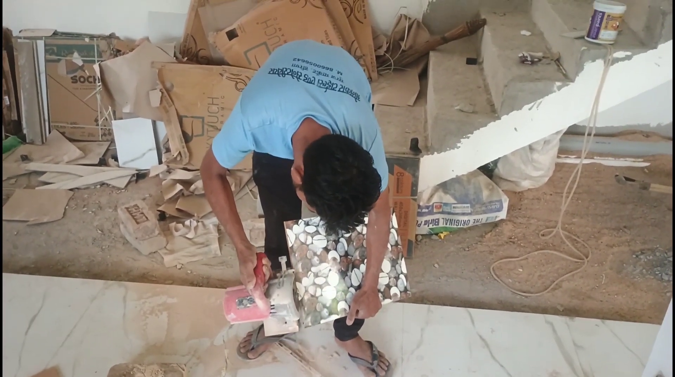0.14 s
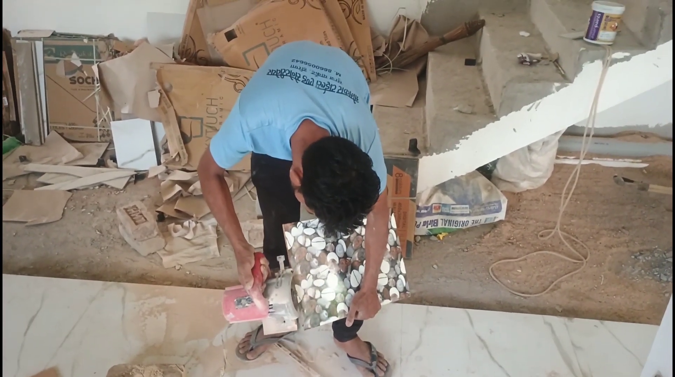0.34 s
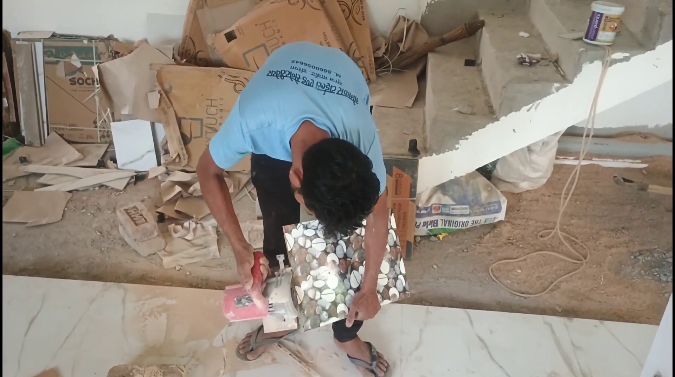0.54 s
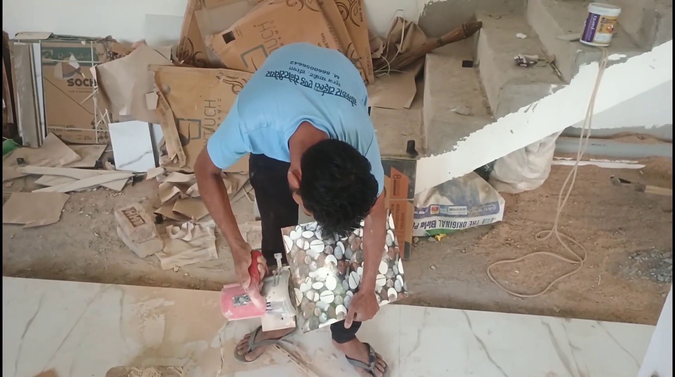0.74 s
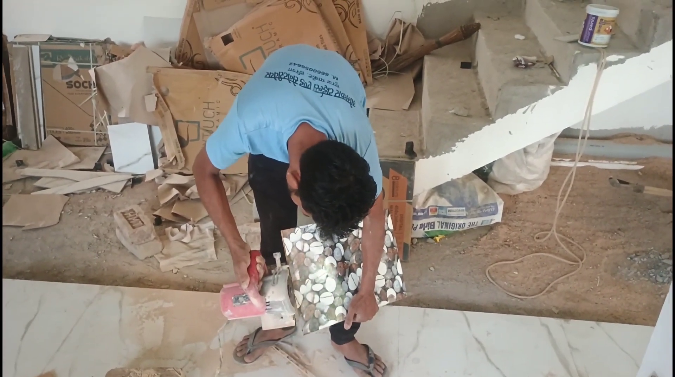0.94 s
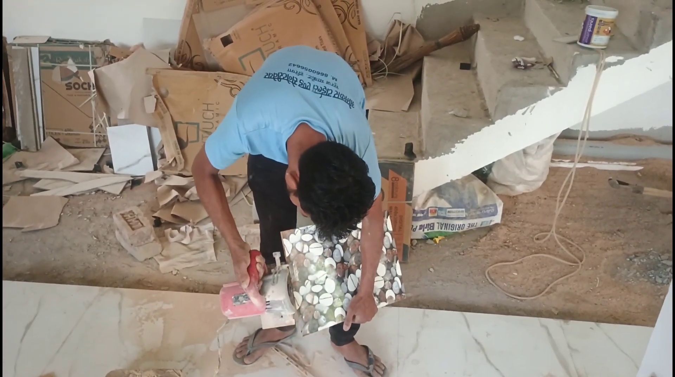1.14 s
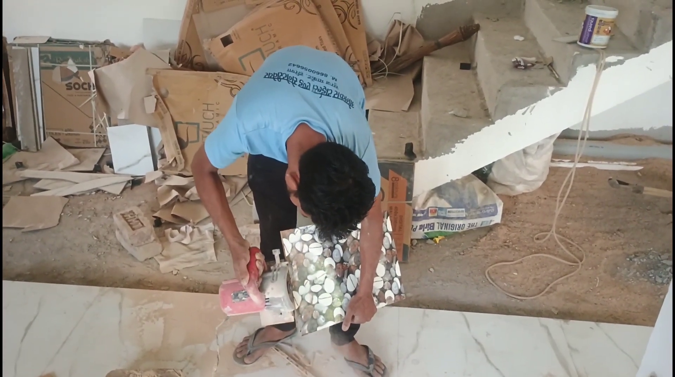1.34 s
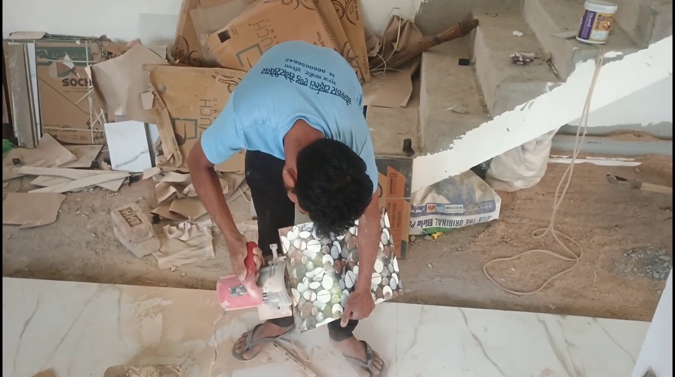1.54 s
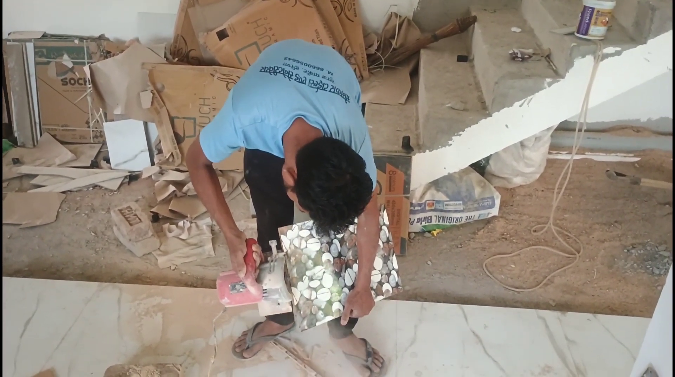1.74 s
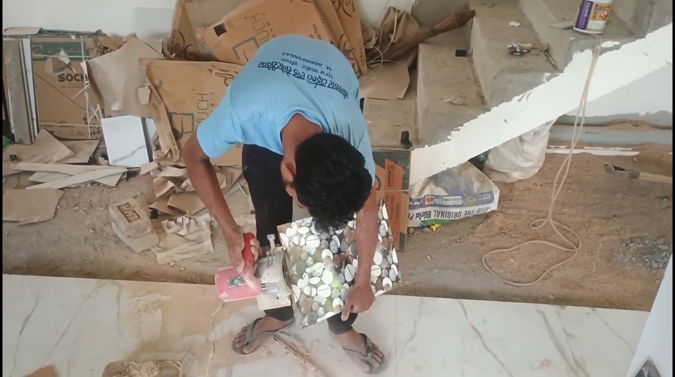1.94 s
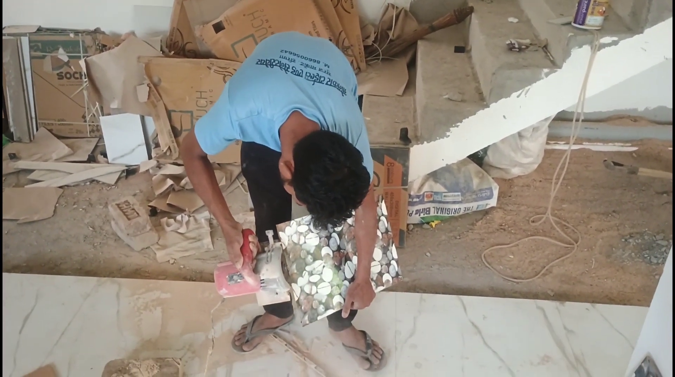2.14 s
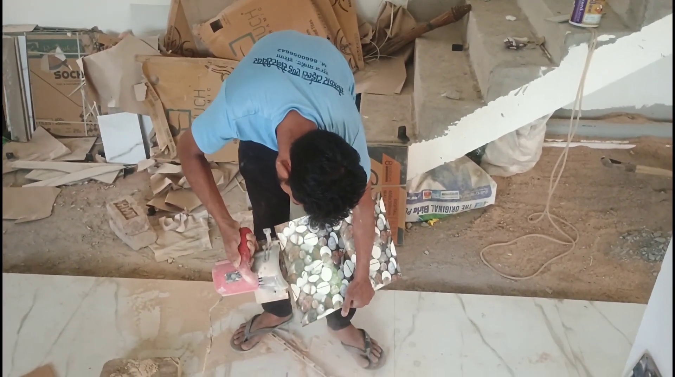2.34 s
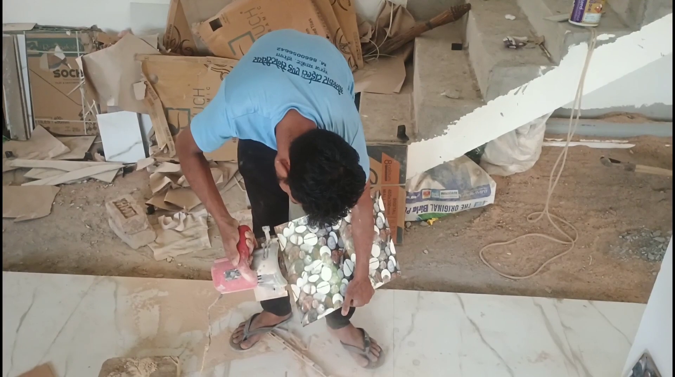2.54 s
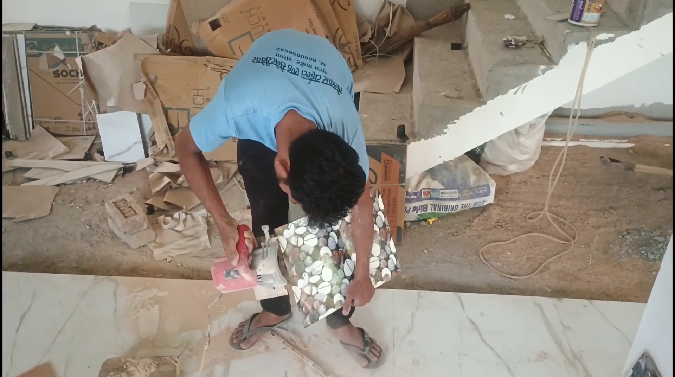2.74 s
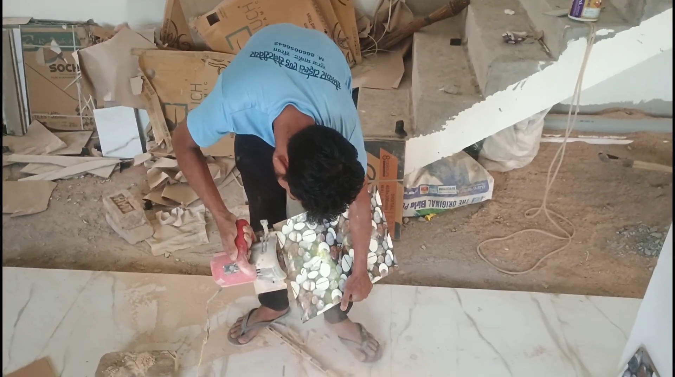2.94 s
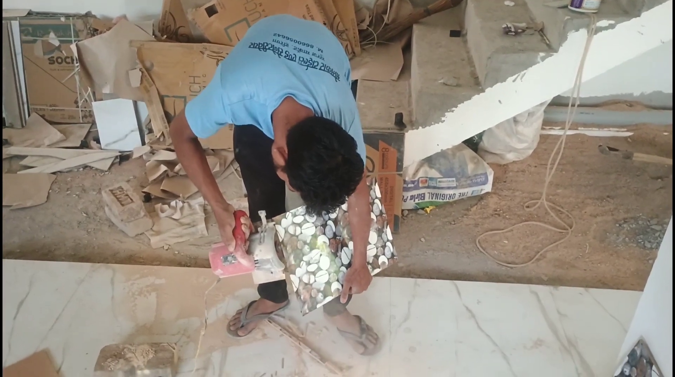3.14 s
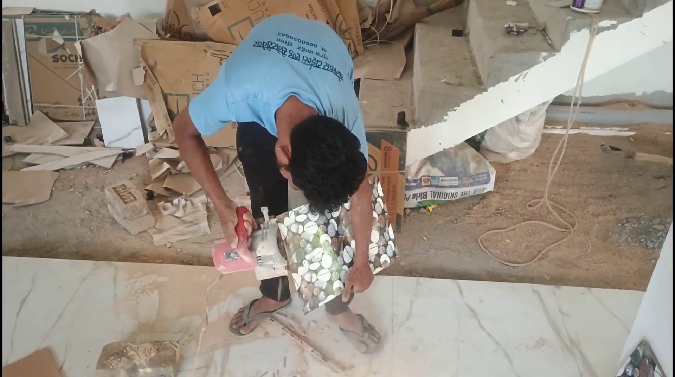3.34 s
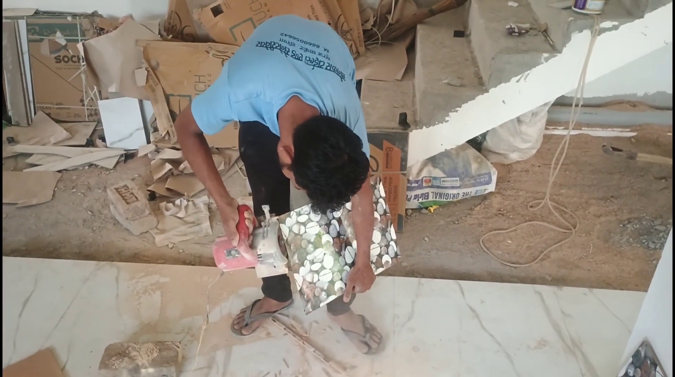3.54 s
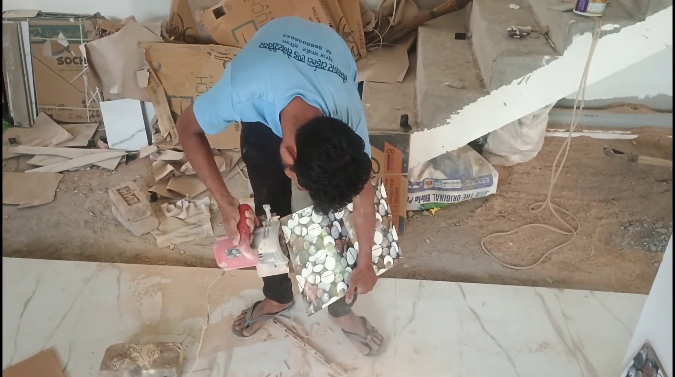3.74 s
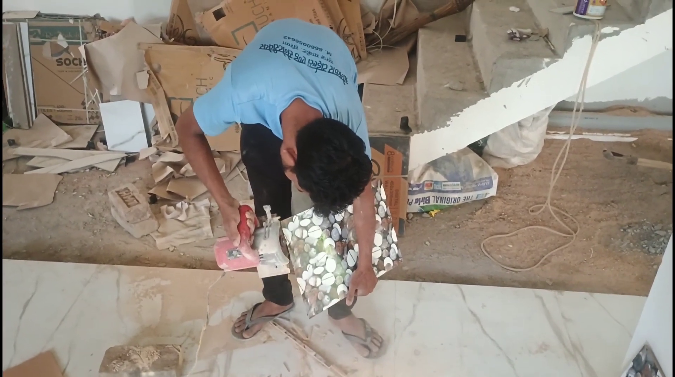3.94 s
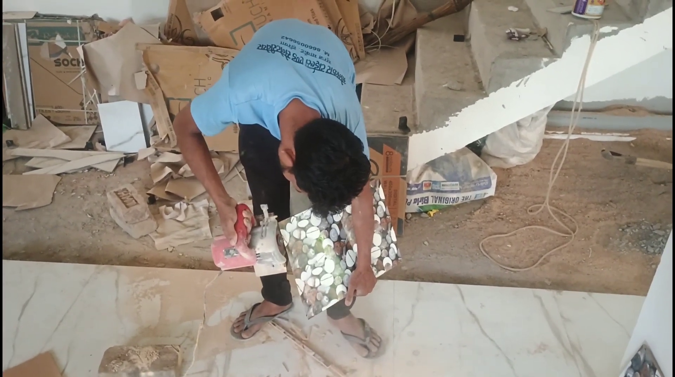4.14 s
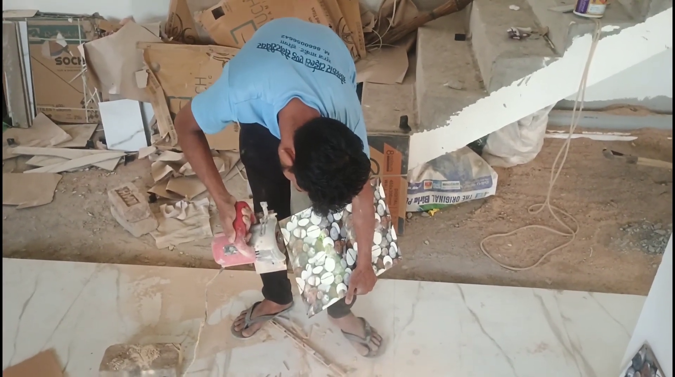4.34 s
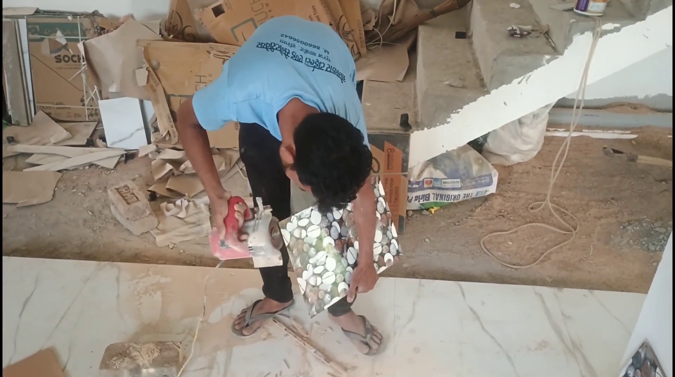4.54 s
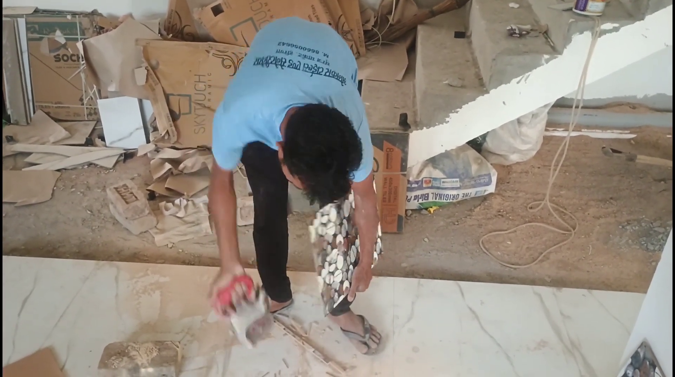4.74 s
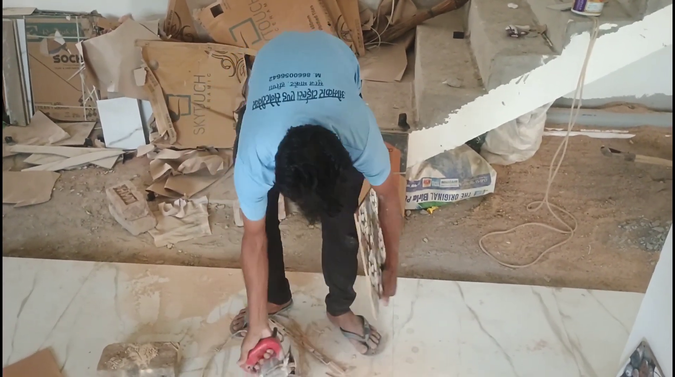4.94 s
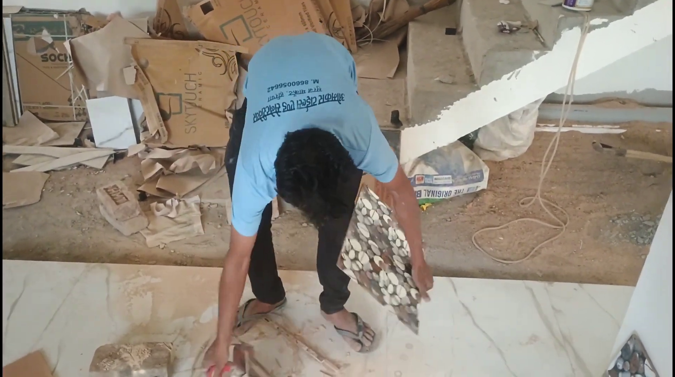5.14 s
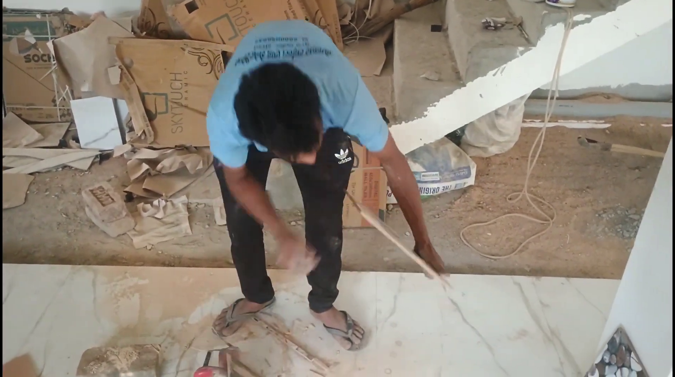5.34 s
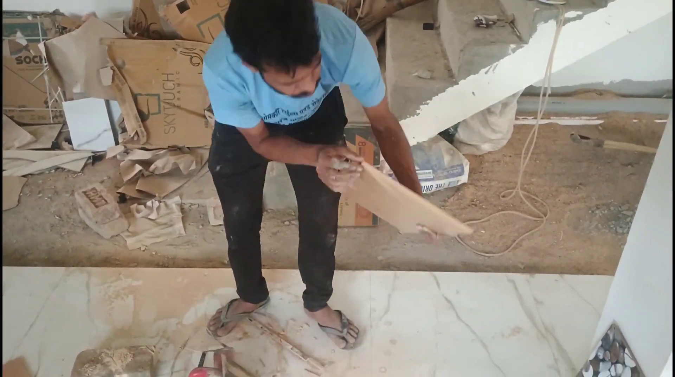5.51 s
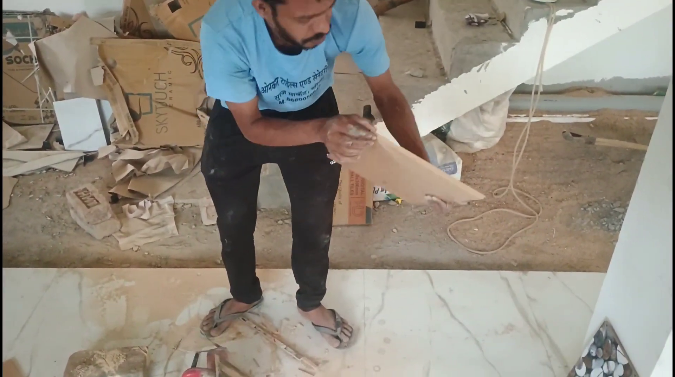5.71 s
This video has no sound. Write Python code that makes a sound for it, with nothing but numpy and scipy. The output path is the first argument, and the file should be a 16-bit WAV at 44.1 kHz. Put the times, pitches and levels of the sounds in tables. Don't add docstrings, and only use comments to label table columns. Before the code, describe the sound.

From 0 to about 4.4 seconds a handheld electric cutter grinds through ceramic tile, already running at full speed. The sound is loud, dense and bright: sandy grit hiss strongest in the treble, many shifting metallic blade resonances, a buzzing motor hum and a gear whine near 900 Hz that briefly slips around 1.2 and 3.6 seconds and rises slightly. Low rumble is faint. At about 4.5 seconds the power is cut; hum fades quickly, the whine slides downward and wavers, and the hiss dips near 4.7 before returning. The freed blade rings high and airy. At 5.05 the tool touches the floor with a soft thud and scrape, then a stronger knock and brighter drag come around 5.3. It rocks slightly, making the sound flutter, while the coasting hiss weakens and dulls until the end at about 5.9, with faint last bumps. Close stereo microphone, bare hallway.

```python
import sys
import numpy as np
from scipy import signal
from scipy.io import wavfile

SR = 44100
rng = np.random.default_rng(int(sys.argv[2]) if len(sys.argv) > 2 else 0)


def generate_wav(sig):
    pcm = np.round(np.clip(np.atleast_2d(sig).T, -1, 1) * 32767).astype(np.int16)
    wavfile.write(sys.argv[1], SR, pcm)


def convert_level_to_amplitude(level_db):
    exponent = np.asarray(level_db, float) / 20
    return 10 ** exponent


N = 258845

SWITCH_OFF_S = 4.5
WHINE_PER_TURN = 2.3885


def rms_one(x):
    return x / np.sqrt(np.mean(x ** 2) + 1e-20)


def in_time(rows):
    s, *columns = np.transpose(rows)
    return [np.interp(np.arange(N) / SR, s, c) for c in columns]


def at_hz(points, hz):
    table_hz, values = np.array(points).T
    return np.interp(np.log(hz), np.log(table_hz), values)


def by_stage(levels_db):
    return np.interp(np.arange(N) / SR, (1, 2.95, 4.3), levels_db)


def drift(rate):
    r = np.exp(-128 * np.pi * rate / SR)
    noise = rng.standard_normal(N // 64 + 1002)
    slow = signal.lfilter([1], [1, -2 * r, r * r], noise)[1000:]
    return np.interp(np.arange(N) / 64, np.arange(len(slow)), rms_one(slow))


def swells(rows):
    t = np.arange(N) / SR
    return sum(size * np.exp(-((t - s) / length) ** 2) for s, size, length in rows)


def resonate(x, hz, width_hz):
    r = np.exp(-np.pi * width_hz / SR)
    return rms_one(signal.lfilter([1, 0, -1], [1, -2 * r * np.cos(2 * np.pi * hz / SR), r * r], x))


def sliding_noise(hz, width_hz):
    lowpass = signal.butter(2, width_hz, fs=SR, output="sos")
    slow = signal.sosfilt(lowpass, rng.standard_normal((2, 2, N)))
    carrier = 2 * np.pi * np.cumsum(hz) / SR
    return rms_one(slow[0] * np.cos(carrier) + slow[1] * np.sin(carrier))


# pitch in Hz, likeness from 0 (unrelated) to 1 (the same).
EAR_LIKENESS = [(60, 0), (130, .1), (290, .6), (640, .86), (1410, .85), (2200, .45), (3000, .25),
                (4500, .5), (8000, .35), (15000, .22)]
# pitch in Hz, left minus right in dB.
EAR_LEAN = [(60, 5), (180, 4), (550, 0), (1650, 1), (4970, -0.5), (15000, 1.5)]


def spread(mid_side, hz):
    alike, lean_db = np.clip(at_hz(EAR_LIKENESS, hz), -1, 1), at_hz(EAR_LEAN, hz) / 2
    mid = np.sqrt(1 + alike) * mid_side[0]
    side = np.sqrt(1 - alike) * mid_side[1]
    lag = 9 if hz > 3100 else 0
    return np.array([convert_level_to_amplitude(lean_db) * (mid + side), convert_level_to_amplitude(-lean_db) * np.roll(mid - side, lag)])


# time in seconds, gear whine in Hz.
LOADED_WHINE = [(0, 895.5), (1.2, 887.8), (1.42, 890.5), (1.85, 890.8), (2.2, 902.4), (2.6, 896.6),
                (3.5, 904), (3.75, 911), (4.5, 916)]


def speed_hz():
    off_s = np.maximum(np.arange(N) / SR - SWITCH_OFF_S, 0)
    fan_halving_s, brush_drag_hz_per_s = .83, 42
    return in_time(LOADED_WHINE)[0] / (1 + off_s / fan_halving_s) - brush_drag_hz_per_s * off_s


# time in seconds, dip in dB.
ROCKS = [
    (5.1, 1),
    (5.175, 4),
    (5.272, 1.5),
    (5.378, 2.5),
    (5.505, 2),
    (5.67, 2),
]


def rocking_db():
    return swells([(s, dip_db, 0.027) for s, dip_db in ROCKS])


# time in seconds, hiss in
# dB.
HISS_LEVEL = [(0, -14.5), (.3, -14), (1.15, -13.5), (1.5, -14), (2.05, -14), (2.5, -14), (2.9, -13.6),
              (3.5, -13.4), (3.75, -14), (4.41, -13.5), (4.73, -20.5), (5.05, -15.5), (5.3, -18), (5.6, -19),
              (5.87, -22.5)]


def loudness_db():
    return in_time(HISS_LEVEL)[0] - rocking_db()


# time in seconds, change in dB, length in seconds.
BOOMS = [
    (2.3, -12, .12),
    (3.3, -9, .12),
    (3.9, -6, .15),
    (4.75, -12, 0.078),
    (4.96, -10, .04),
    (5.07, 4, .04),
    (5.35, 14, 0.055),
    (5.51, 8, .03),
    (5.86, 4, .06),
]


def balance_db(level_db, in_cut):
    t = np.arange(N) / SR
    slowed = 1 - speed_hz() / LOADED_WHINE[-1][1]
    lows_db = -17 - .8 * (level_db + 14) * in_cut + 8 * slowed
    cutting = np.clip((4.4 - t) / .05, 0, 1)
    cut_rumble_db, free_rumble_db = -48.5 - 1 * t, -61.5
    return lows_db, cutting * cut_rumble_db + (1 - cutting) * free_rumble_db + swells(BOOMS)


# pitch in Hz, level in dB per Hz.
GRINDING = [(20, -29), (150, -33.5), (300, -31), (650, -20.5), (1080, -14.5), (2400, -13.5), (3200, -3.5),
            (4300, -1), (5200, -2.5), (8000, 1), (11500, -2.5), (14300, -1.5), (16000, -17)]
# pitch in Hz, level in dB per Hz.
COASTING = [(20, -39), (150, -35), (280, -38.5), (450, -24), (700, -14.5), (1140, -10), (2400, -10),
            (3340, -4), (5140, -6.5), (6210, -5), (7700, -5), (13200, -8), (16000, -17)]


def hiss(in_cut, patchy_db, bass_lumps_db):
    level_db = loudness_db()
    lows_db, rumble_db = balance_db(level_db, in_cut)
    lumps = drift(2.9)
    white = rng.standard_normal((2, 2, N))
    edges_hz = 22 * 2 ** (np.arange(30) / 3)
    out, power, together = 0, 0, drift(5.7)
    for k, (low, high) in enumerate(zip(edges_hz, edges_hz[1:])):
        hz = np.sqrt(low * high)
        gain = convert_level_to_amplitude(in_cut * at_hz(GRINDING, hz) + (1 - in_cut) * at_hz(COASTING, hz))
        power = power + gain ** 2 * (high - low)
        if hz < 240:
            lumpy_db = bass_lumps_db * (0.45 * lumps + drift(9.3))
            gain = gain * (convert_level_to_amplitude(rumble_db + 51.5 + lumpy_db) + convert_level_to_amplitude(-25))
        elif hz < 2200:
            gain = gain * convert_level_to_amplitude(lows_db + 13.0 + 5.97 * in_cut)
        flicker_db = patchy_db * (2.2 - 1.18 * in_cut) * (0.81 * together + drift(11.4))
        band_filter = signal.butter(2, [low, high], "band", fs=SR, output="sos")
        band = signal.sosfilt(band_filter, white[k % 2])
        out = out + gain * convert_level_to_amplitude(flicker_db) * spread(band, hz)
    return convert_level_to_amplitude(level_db - 2.5 + 1.08 * (1 - in_cut)) * out * np.sqrt(SR / 2 / power)


BLADE_HZ = [1830, 2630, 3438, 4200, 4340, 4650, 4848, 5358, 5765, 6755, 6912, 7050, 7300, 7506, 7655, 7750,
            8000, 8400, 8950, 9230, 9458, 11355, 11560, 11738, 12200, 12800, 14600]
# width in Hz, level in dB at start, middle and end of the cut.
BLADE_SHAPES = [(86.4, -43, -40, -43), (75.6, -41.5, -45.5, -39), (50, -49.5, -52, -39.5),
                (35, -36, -34, -29.5), (252, -28.5, -30, -32), (348, -30, -35.5, -30), (50, -33, -33, -37),
                (50, -40, -51, -34), (50, -33.5, -36.5, -61), (90, -29.5, -33.5, -30.5),
                (80, -27.5, -35.5, -27), (120, -29, -40, -26), (120, -29, -30, -32),
                (46.296, -33, -29, -34), (50, -39, -34, -28), (46.296, -26.5, -28, -32),
                (110, -31, -26.5, -26.5), (60, -30.5, -52, -40), (70, -34, -32, -43), (110, -30, -31, -33),
                (50, -41, -44, -41), (50, -26, -28, -29.5), (200, -30.5, -31.5, -29), (50, -27.5, -46, -33),
                (100, -33, -43, -30), (70, -31, -36, -40), (120, -32, -41, -43)]


def blade(in_cut, wander_db):
    grit, out = rng.standard_normal((2, N)), 0
    for k, (hz, (width_hz, *levels_db)) in enumerate(zip(BLADE_HZ, BLADE_SHAPES)):
        wander = wander_db * np.array([drift(0.85), drift(0.4)])
        gain = convert_level_to_amplitude(by_stage(levels_db) + wander)
        ringing = spread(resonate(grit, hz, width_hz), hz)
        out = out + (-1) ** k * gain * ringing
    return out * convert_level_to_amplitude(loudness_db() + 15) * in_cut


# time in seconds, whine change in dB, hum change in dB, length in seconds.
BITES = [
    (.3, 2, 1.5, 0.69),
    (.95, -0.5, 3, 0.28),
    (1.24, -9, -1, 0.095),
    (3.0, -1.5, -1.5, 0.76),
    (3.61, -8, 0, 0.07),
    (3.74, 4, 4, 0.14),
    (4.097, 1.5, 2.5, 0.37),
]
# time in seconds, dip in dB, length in seconds.
SCREENS = [
    (4.71, -6, .05),
    (4.85, -8, .12),
    (5.08, -6, .06),
    (5.45, -14, .07),
    (5.7, -20, .25),
]


def motor_db(whine_hz):
    off_s = np.maximum(np.arange(N) / SR - SWITCH_OFF_S + 0.11, 0)
    whine_db = -38 + swells([(s, db, length) for s, db, _, length in BITES] + SCREENS)
    whine_db = whine_db + 8.5 * np.log2(whine_hz / LOADED_WHINE[-1][1])
    hum_db = -30 + swells([(s, db, length) for s, _, db, length in BITES])
    return whine_db, hum_db - 24 * (1 - np.exp(-off_s / 0.2))


# multiple, extra
# level in dB at the start, middle and end of the cut.
UNEVEN_ORDERS = [(1, 1, 9, -6), (4, 7, 14, 9.5), (7, 5, 12, -4), (8, 10, 0, 9), (9, 5, 10, 6),
                 (11, 6.5, 12.5, 9.5), (13, -2, -8, -3), (14, 5.5, -5, 12), (16, 0, 8, 6.5),
                 (18, 11, 13, -8), (20, 6, 13, -1), (21, -9, -1, -10), (24, -11, 0, 0), (31, 8, 17, 9),
                 (39, 5, 0, 0)]


def motor(fade_db, jitter):
    whine_hz = speed_hz()
    whine_db, hum_db = motor_db(whine_hz)
    coasting = 1 - whine_hz / whine_hz.max()
    wobble = (jitter + 0.0124 * coasting) * drift(12.0)
    whine_turns = np.cumsum(whine_hz * (1 + wobble)) / SR
    whine = np.sqrt(2) * convert_level_to_amplitude(whine_db + (1.65 + 2.5 * coasting) * drift(25))
    whine = whine * np.sin(2 * np.pi * whine_turns)
    ears_db = np.array([[-.6], [.6]]) + 1.8 * np.array([drift(3.5), drift(7.0)])
    out = whine * convert_level_to_amplitude(ears_db)
    extra = {round(order): levels_db for order, *levels_db in UNEVEN_ORDERS}
    for order in range(1, 41):
        hz = order * LOADED_WHINE[0][1] / WHINE_PER_TURN
        level_db = hum_db - 9.5 + at_hz(GRINDING, hz) + by_stage(extra.get(order, (0, 0, 0)))
        paths = []
        for _ in range(2):
            turns = order * whine_turns / WHINE_PER_TURN + rng.random()
            paths.append(convert_level_to_amplitude(fade_db * drift(2.5)) * np.sin(2 * np.pi * turns))
        out = out + convert_level_to_amplitude(level_db) * spread(paths, hz)
    return out


# time in seconds, level in dB.
MAIN_RING = [(4.72, -32), (4.85, -28), (4.95, -29.5), (5.04, -24.5), (5.36, -25), (5.43, -18),
             (5.56, -19.5), (5.7, -27), (5.87, -28)]
# time in seconds, rise in dB, length in seconds.
LOWER_SWELLS = [
    (5.0, 4.8, .1),
    (5.32, 8.8, .03),
    (5.73, 11, 0.21),
]


def free_ring(in_cut):
    t = np.arange(N) / SR
    main_hz = 7300 - 200 * (t - SWITCH_OFF_S)
    main_db = in_time(MAIN_RING)[0] - 0.72 * rocking_db()
    upper_hz = 9400 - 750 * (1 + np.tanh((t - 5.11) / .05)) / 2
    upper_db = -42 + swells([(5.17, 12.5, .2)])
    lower_db = -34.5 + swells(LOWER_SWELLS)
    lean_db = 3.5 + swells([(5.08, 5.6, 0.29)])
    rings = convert_level_to_amplitude(main_db + 2.2) * sliding_noise(main_hz, 190)
    rings = rings + convert_level_to_amplitude(upper_db + 4.0) * sliding_noise(upper_hz, 220)
    lower = convert_level_to_amplitude(lower_db + 2.5) * resonate(rng.standard_normal((2, N)), 5200, 420)
    return (1 - in_cut) * (rings * convert_level_to_amplitude(lean_db / 2 * np.array([[1], [-1]])) + lower)


# time in seconds, peak in dB, thud pitch in Hz, time to fade by 60 dB in seconds.
BUMPS = [(5.03, -34, 332, .25), (5.045, -43, 210, 0.28), (5.075, -27.5, 265, 0.11), (5.31, -22, 460, 0.11),
         (5.313, -29, 188, 0.29), (5.315, -27, 324, 0.088), (5.345, -28, 240, 0.15),
         (5.381, -44, 190, 0.18), (5.62, -46, 384, 0.4), (5.79, -43, 257, .4), (5.82, -48, 180, .4)]
# time in seconds, length in seconds, pitch in Hz, width in Hz, level in dB.
DRAGS = [
    (5.04, 0.048, 1830, 300, -29),
    (5.256, 0.18, 920, 120, -35),
    (5.25, 0.13, 1840, 300, -30),
    (5.337, 0.16, 2320, 500, -29),
]


def put_down():
    t, out = np.arange(N) / SR, np.zeros((2, N))
    for s, peak_db, hz, t60_s in BUMPS:
        age = np.maximum(t - s, 0)
        shape = convert_level_to_amplitude(peak_db - 60 * age / t60_s) * (1 - np.exp(-age / 0.00093))
        thud = resonate(spread(rng.standard_normal((2, N)), hz / 2), hz, .5 * hz)
        out += shape * (0.48 * np.sin(2 * np.pi * hz * age) + 0.37 * thud)
    for s, length_s, hz, width_hz, level_db in DRAGS:
        shape = convert_level_to_amplitude(level_db) * np.exp(-(2 * (t - s) / length_s) ** 2)
        out += shape * resonate(rng.standard_normal(N), hz, width_hz)
    return out


def scene():
    in_cut = np.interp(np.arange(N) / SR, (4.31, 4.9), (1, 0))
    cutter = hiss(in_cut, patchy_db=0.49, bass_lumps_db=3.5) + motor(fade_db=3.0, jitter=0.00039)
    steel = blade(in_cut, wander_db=1.6) + free_ring(in_cut)
    steel = signal.sosfilt(signal.butter(4, 900, "high", fs=SR, output="sos"), steel)
    bumps = signal.sosfilt(signal.butter(4, 150, "high", fs=SR, output="sos"), put_down())
    return cutter + steel + bumps


def band_limit(x):
    return signal.sosfilt(signal.butter(12, 15910, fs=SR, output="sos"), x)


def record(dry):
    dull = signal.sosfiltfilt(signal.ellip(8, .2, 40, 13900, fs=SR, output="sos"), dry)
    top_db = np.interp(np.arange(N) / SR, (5.53, 5.8), (0, -35))
    fading = dull + convert_level_to_amplitude(top_db) * (dry - dull)
    cut = signal.sosfilt(signal.ellip(12, .5, 80, 15470, fs=SR, output="sos"), fading)
    return band_limit(np.clip(convert_level_to_amplitude(-0.37) * cut, -1, 1))


dry = scene()
out = record(dry)
generate_wav(out)
```